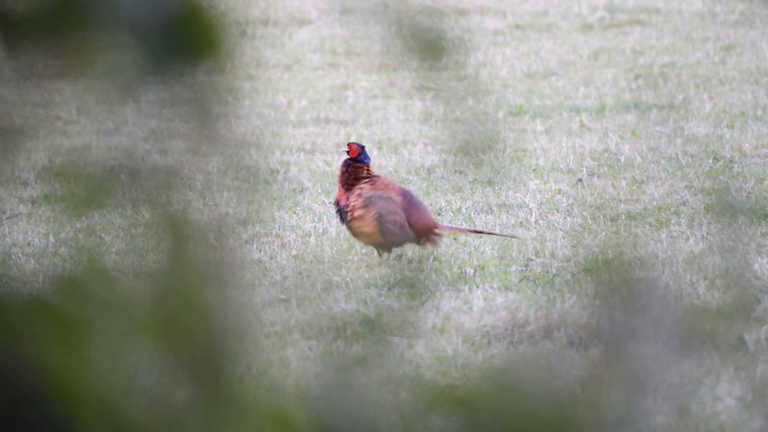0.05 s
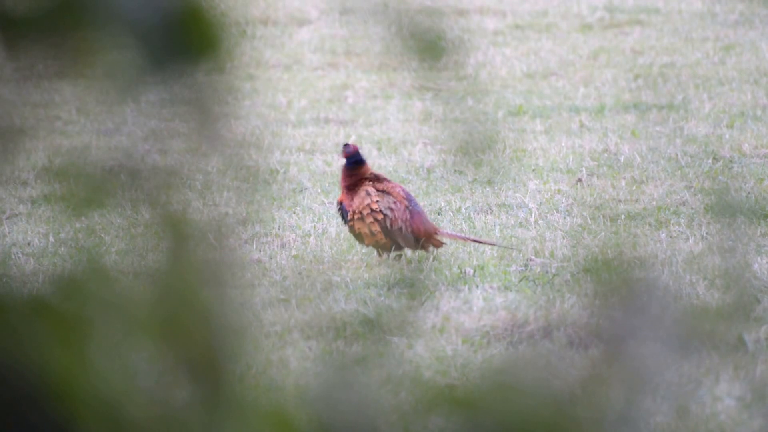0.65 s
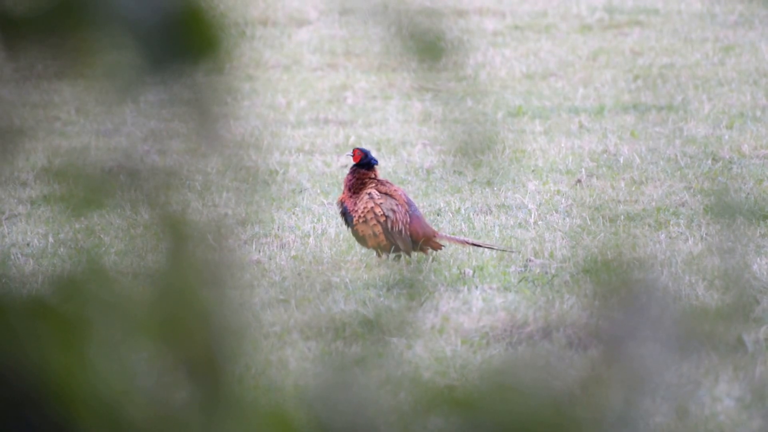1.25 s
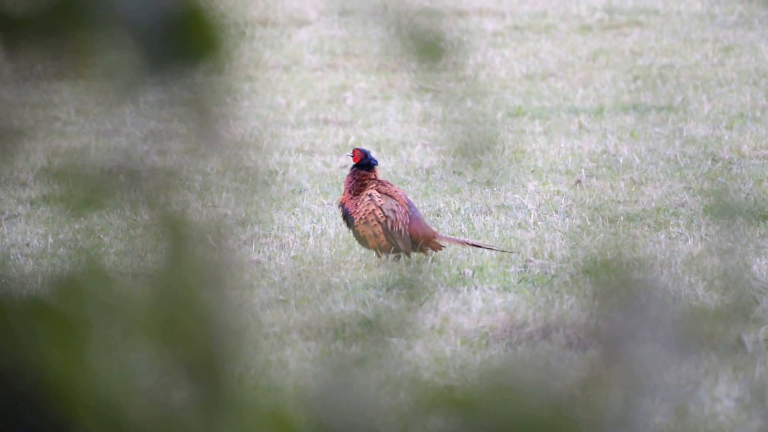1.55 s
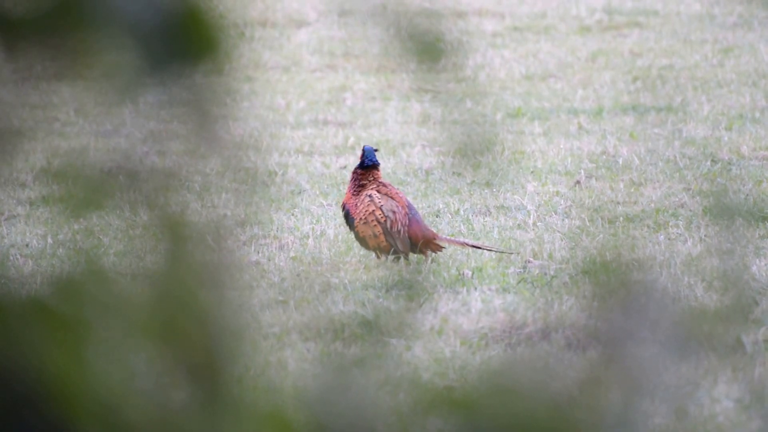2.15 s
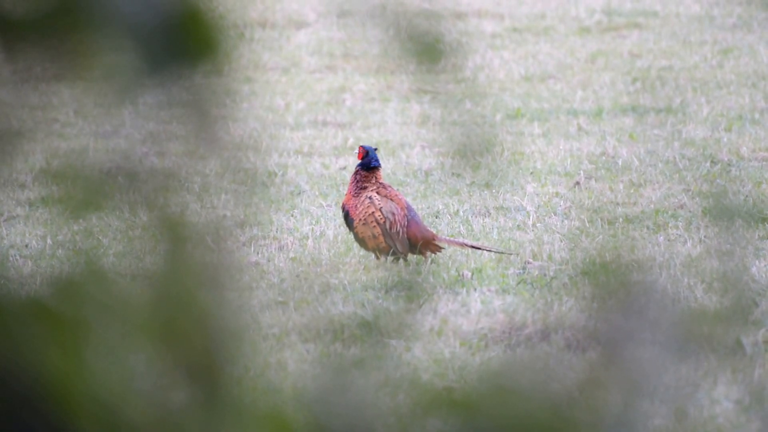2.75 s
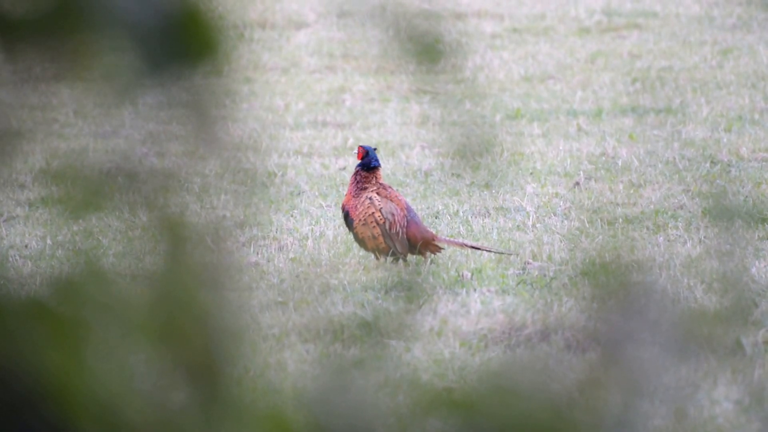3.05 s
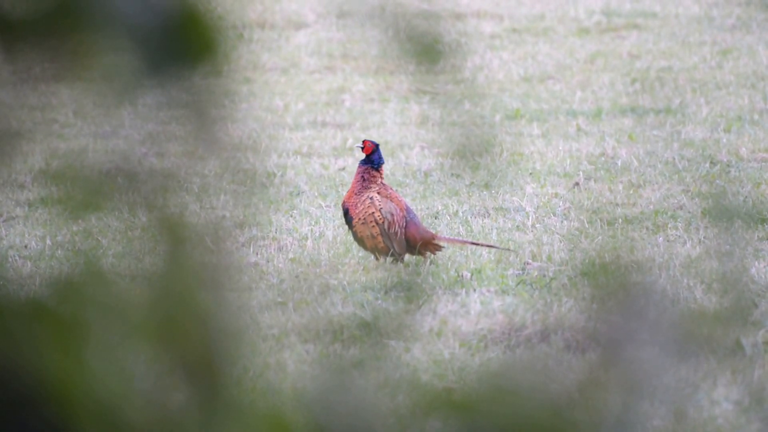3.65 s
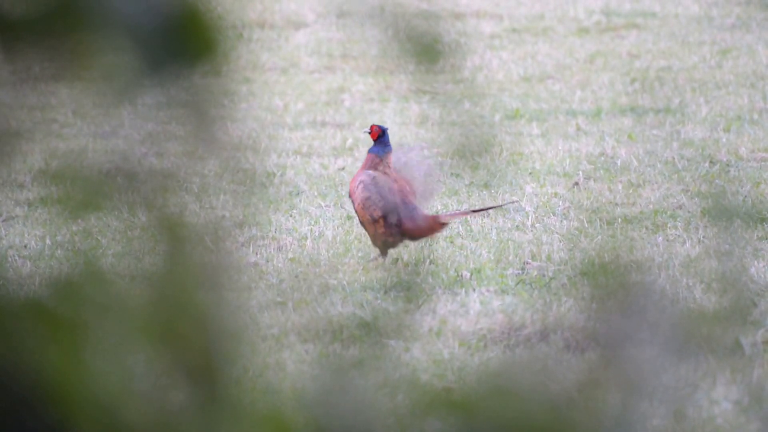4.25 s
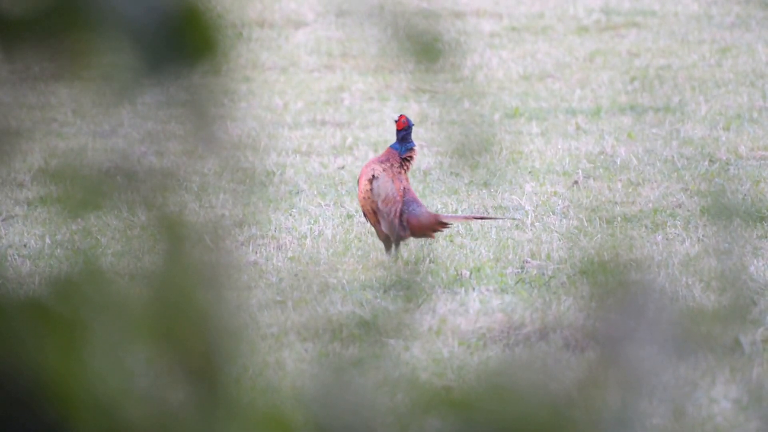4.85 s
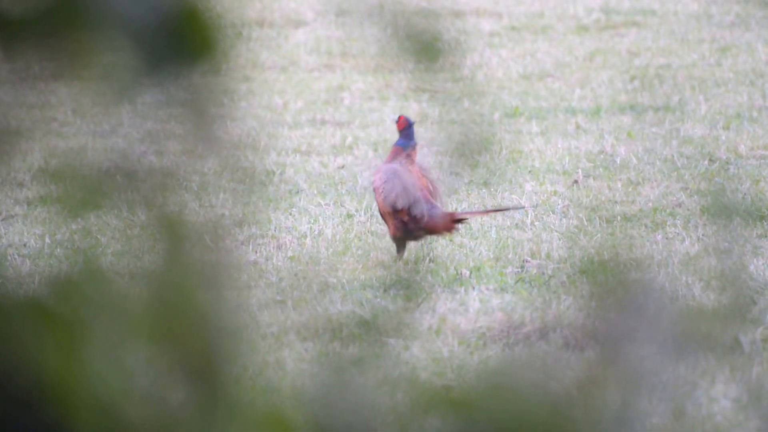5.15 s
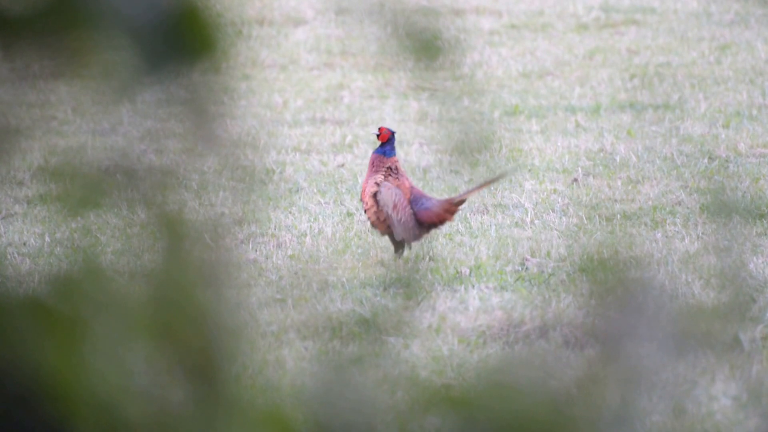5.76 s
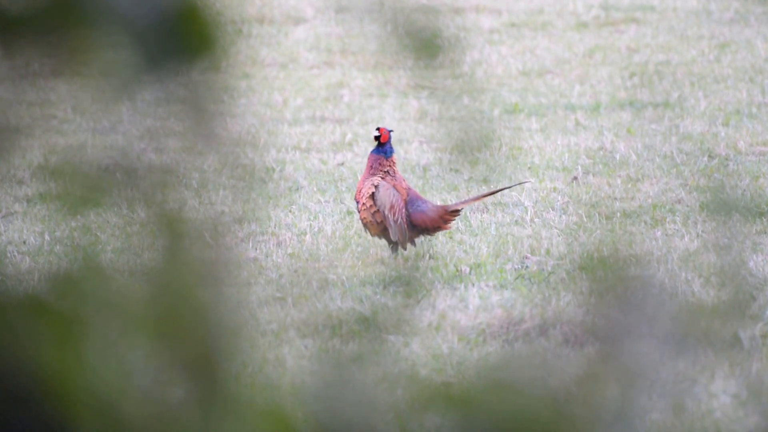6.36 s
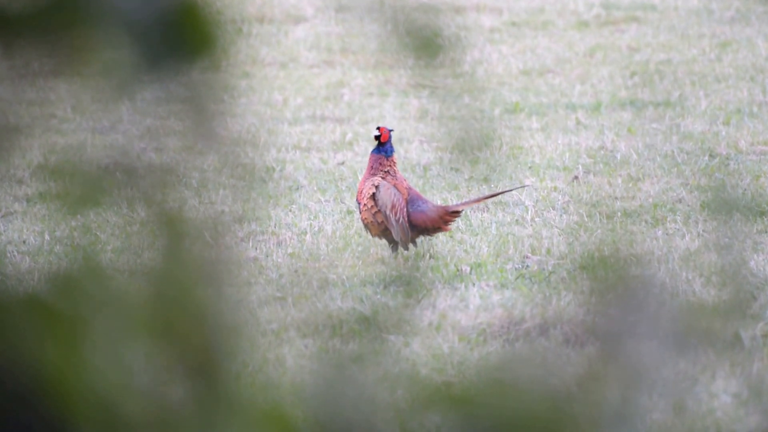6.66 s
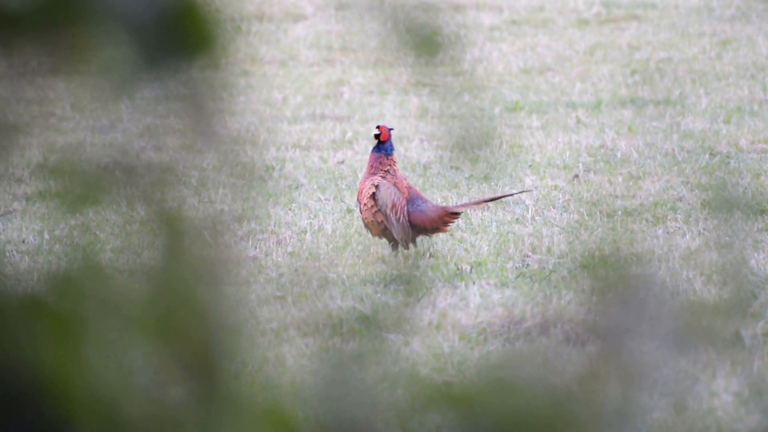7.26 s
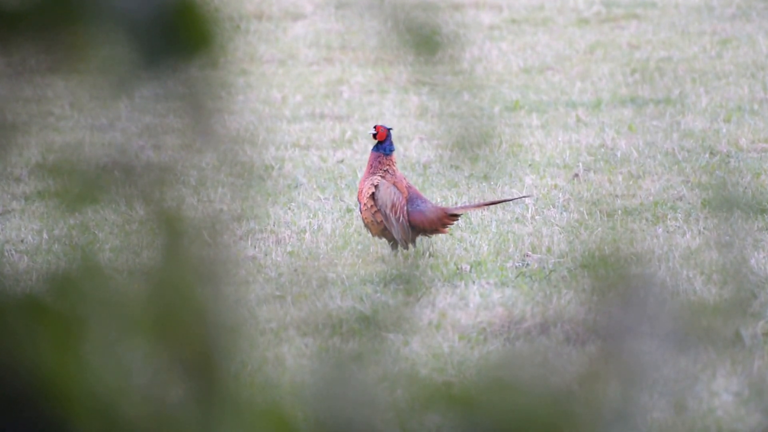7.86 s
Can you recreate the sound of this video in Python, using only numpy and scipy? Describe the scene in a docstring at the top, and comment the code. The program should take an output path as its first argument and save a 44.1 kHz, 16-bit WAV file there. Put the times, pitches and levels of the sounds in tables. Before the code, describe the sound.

Steady hiss in a quiet field, then a pheasant crows twice harshly, flutters its wings and calls softly three times.

```python
"""Cock pheasant on a meadow

A harsh double crow, a whirr of wings and three softer calls. The two sides of the syrinx sound
at once: rasping when forced, ringing with sum and difference tones when eased. Near shrubs and the
wood's edge scatter the sound back, and a far tree line echoes it. Under it all lie distant outdoor
noise and the camera's steady, ringing hiss; a few soft bumps reach the microphone near the end."""
import sys
import numpy as np
from scipy import signal
from scipy.fft import rfft, irfft
from scipy.io import wavfile
from scipy.ndimage import uniform_filter1d, minimum_filter1d

SR = 44100
rng = np.random.default_rng(int(sys.argv[2]) if len(sys.argv) > 2 else 0)


def transcribe(signal):
    """Save signal, clipped to [-1, 1], as a 16-bit WAV file at the path in sys.argv[1]."""
    frames = np.atleast_2d(signal).T
    limited = np.clip(frames, -1, 1)
    pcm = np.round(limited * 32767).astype(np.int16)
    wavfile.write(sys.argv[1], SR, pcm)


N = 348831
T = np.arange(N) / SR
FREQ = np.arange(N // 2 + 1) * SR / N


def undb(db):
    """Decibels to gain."""
    return np.exp(np.asarray(db) * np.log(10) / 20)


def unit(x):
    """Scale to rms 1."""
    return x / np.sqrt(np.mean(x ** 2))


def shape(x, gain):
    """Filter by a gain per frequency; rms 1."""
    return unit(irfft(rfft(x) * gain, N))


def colour(points):
    """Gain per frequency from (Hz, dB) points."""
    hz, db = np.transpose(points)
    return undb(np.interp(np.log(FREQ + 1), np.log(hz), db))


def noise(gain):
    """Coloured noise of rms 1."""
    return unit(irfft(rng.standard_normal(2 * len(FREQ)).view(complex) * gain, N))


def wander(rate_hz):
    """Smooth random motion of rms 1, mostly slower than rate_hz."""
    return noise(np.exp(-np.minimum(.5 * (FREQ / rate_hz) ** 2, 20)))


def throb(rate_hz, depth):
    """Bounded random swings of loudness; rms 1."""
    return unit(1 + depth * np.tanh(wander(rate_hz)))


def turn(hz):
    """Phase of an oscillator with a moving pitch."""
    return 2 * np.pi * np.cumsum(hz) / SR


def swell(at, width):
    """A bell-shaped envelope; times in seconds."""
    return np.exp(-np.minimum(.5 * ((T - at) / width) ** 2, 20))


def ramp(start, length):
    """Rises from 0 to 1 over length seconds."""
    return np.clip((T - start) / length, 0, 1)


def held(start, length, attack, release):
    """A gate that opens just before the start, holds for length seconds and dies away."""
    rise = np.minimum(T - start, 0) / attack
    fall = np.maximum(T - start - length, 0) / release
    return np.exp(np.maximum(rise - fall, -20))


def swing(at, hz):
    """One suction followed by one push of air."""
    return swell(at, 0.63 / hz) * np.sin(2 * np.pi * hz * (T - at))


def outdoor_air():
    """Steady outdoor noise and microphone hiss, with one low swell in the distance."""
    # spectrum of the noise floor: frequency_hz, level_db
    floor_spectrum = [(20, -14.5), (70, -1.5), (190, 1), (290, -4), (680, -3), (1300, -8.5), (2300, -11),
                      (3500, -10.5), (5000, -8), (6300, -23.5), (6900, -17), (8500, -22.5), (11000, -24.5),
                      (15500, -25)]
    breeze_db = .35 * wander(5)
    air = noise(colour(floor_spectrum)) * undb(-49.8 + breeze_db)
    distant = noise(colour([(120, -14), (220, 3.5), (330, 3), (480, -17), (1000, -45)]))
    return air + distant * swell(at=0.79, width=0.43) * undb(-59)


def camera_hiss():
    """The camera's own hiss rings in narrow resonances and flickers slightly."""
    # resonances: centre_hz, width_hz, relative_db
    resonances = [(2680, 62, -12), (2880, 27, -7), (3870, 110, -2.5), (3944, 37, 2.5), (4280, 130, -6),
                  (4316, 18, 0.5), (4540, 340, -7.5), (4795, 32, 3), (5170, 59, -5), (5334, 194, 0),
                  (5980, 36, -13), (6130, 265, -1.5), (6150, 55, -9)]
    power = sum(undb(db) ** 2 / (1 + 2 * ((FREQ - hz) / width) ** 2) ** 2
                for hz, width, db in resonances)
    flicker_db = 1.1 * wander(32) + .4 * wander(1)
    return noise(np.sqrt(power)) * undb(-49.5 + flicker_db)


def squeaks():
    """Before it breaks into the rasp, the syrinx briefly whistles with a strong octave."""
    # one thin squeak per crow syllable: peak_s, pitch_hz, level_db, length_s
    onsets = [(4.68, 2690, -30, 0.01), (5.088, 2735, -32.5, 0.01)]
    out = 0
    for at, hz, db, length in onsets:
        phase = 2 * np.pi * hz * T
        tone = 0.7 * np.sin(phase) + 1.3 * np.sin(2 * phase)
        out += undb(db) * swell(at, length / 2) * tone
    return out


def crow():
    """One membrane shrieks on its fourth harmonic and slaps chaotically; the other sings low."""
    # the double crow: start_s, length_s, shriek_hz, low_hz, then the levels
    # that the pressure scales: shriek_db, low_db, rasp_db
    syllables = [(4.684, 0.16, 3856, 1042, -11.5, -34, -18), (5.089, 0.044, 3932, 1043, -14.5, -31, -22.5)]
    # response of the throat and open beak: frequency_hz, gain_db
    throat = [(480, -33), (720, -11), (1100, -18), (1450, -9.5), (1880, -8.5), (2250, -11), (2850, -15),
              (3600, 5), (4300, -12), (4900, -3), (6100, -8), (7200, -20.5), (7900, -16), (11500, -33)]
    build_share, rasp_build_share, ease_s = 0.2, 0.32, 0.031  # pressure builds, holds, then eases
    start_flat, shriek_sag, low_sag = .013, 0.028, .056  # shares of pitch
    # the air pressure flutters, and each partial throbs
    flutter, low_throb, octave_throb = throb(90, .36), throb(50, .5), throb(60, .9)
    shriek_drift, low_drift = 1 + 0.0094 * wander(198), 1 + 0.0095 * wander(130)
    slap_drift, slap_throb = 1 + .09 * wander(711.5), throb(600, 0.67)
    breath = rng.standard_normal(N)
    shriek_jitter, octave_jitter = .34 * wander(600), 1.1 * wander(70)
    out = 0
    for start, length, shriek_hz, low_hz, shriek_db, low_db, rasp_db in syllables:
        # pitch and loudness follow the pressure
        built, eased = ramp(start, build_share * length), ramp(start + length - ease_s, ease_s)
        slack = 1 - built * (1 - eased)
        fundamental_hz = shriek_hz / 4 * (1 - start_flat * (1 - built) - shriek_sag * eased)
        phase = turn(fundamental_hz * shriek_drift)
        low_phase = turn(low_hz * (1 - low_sag * ramp(start, length) ** 2) * low_drift)
        # the low voice pulls at the shriek and throws side tones around it
        pull = 0.22 * np.sin(low_phase) + shriek_jitter
        shriek = np.sin(4 * phase + pull) * flutter
        # the two fundamentals beat against each other, which makes the crow rattle
        low = np.sin(low_phase) * low_throb + undb(-15) * np.sin(phase)
        voices = undb(shriek_db - 7 * slack) * shriek + undb(low_db - 3 * eased) * low
        octave = undb(-8.5) * np.sin(2 * phase + octave_jitter) * octave_throb
        slap_phase = turn(fundamental_hz * slap_drift)
        slaps = unit(np.exp(60 * (np.cos(slap_phase) - 1)) * slap_throb)  # one sharp pulse a cycle
        rasp = shape(slaps + .25 * breath, colour(throat)) * flutter
        rasp_cut_db = 6.75 - 4.5 * ramp(start, rasp_build_share * length) + 8 * eased
        gate = held(start, length, attack=0.0027, release=0.0019)
        out += gate * (voices + undb(rasp_db - rasp_cut_db) * (rasp + octave))
    return out


def tree_scatter(x, early_db=-5.5, early_t60_s=0.2, late_db=-10.5, late_t60_s=0.57):
    """Near shrubs answer at once, the wood's edge a little later and for longer."""
    # colour of the scatter: frequency_hz, gain_db
    scatter_spectrum = [(300, -9.5), (1000, 4), (1900, -4), (2900, -4.5), (3800, -4), (5100, 3.5),
                        (7500, -2), (13000, -1)]
    tint = colour(scatter_spectrum)
    early = noise(1) * undb(-60 * T / early_t60_s) * (T > .012)
    late = noise(1) * undb(-60 * T / late_t60_s) * (1 - np.exp(-(T / 0.041) ** 2))
    response = (undb(early_db) * shape(early, tint) + undb(late_db) * shape(late, tint)) / np.sqrt(N)
    return signal.fftconvolve(x, response[:SR])[:N]


def far_echo(x, delay_s=.565):
    """A distant tree line returns a faint, dull copy."""
    tint = colour([(500, -42), (1100, -36), (1600, -39), (2100, -31), (3500, -44), (7000, -58)])
    return np.interp(T - delay_s, T, irfft(rfft(x) * tint, N), left=0)


def wing_whirr(count=6, first_s=5.301, beat_s=.0708, quicken_s=0.0016):
    """Quickening downstrokes thump the air, softer upstrokes follow; feathers rustle, quills snap."""
    # quills snapping together: time_s, level_db
    quills = [(5.311, -27), (5.4525, -26.5), (5.5315, -34), (5.575, -31)]
    k = np.arange(count)
    times = first_s + beat_s * k - quicken_s * k * (k - 1) / 2
    levels_db = np.where(k < count - 1, -41.2, -51)  # the last beat is only a weak flick
    thumps = strokes = 0
    for at, db in zip(times, levels_db):
        thumps += undb(db - 2) * swing(at, hz=85)
        down, up = swell(at, 0.0079), 0.42 * swell(at + 0.054, 0.016)
        strokes += undb(db) * (down + up)
    whoosh = noise(colour([(40, -13), (90, 1.5), (140, 4.5), (260, -7.5), (450, -0.5),
                           (750, -17.5), (2000, -47)]))
    rustle = noise(colour([(400, -12), (1500, 1), (3500, 0), (6000, -13), (11000, -24)]))
    feathers = whoosh + undb(-7.5) * rustle
    snaps = sum(undb(db) * swing(at, hz=2700) for at, db in quills)
    return thumps + strokes * feathers + snaps


def soft_calls():
    """A whistle and a second voice modulate each other, giving sum and difference tones."""
    # the three calls: start_s, length_s, whistle_hz, second_hz, scatter_share (of second_hz),
    # whistle_db, second_db (base for its tones), overtone_db, overtone_lag_s
    calls = [(5.5, 0.067, 3606, 1995, .022, -20.5, -39.5, -32, 0.059),
             (5.81, 0.049, 3664, 2085, 0.012, -25, -30, -34, 0.057),
             (6.18, 0.047, 3686, 2098, 0.013, -27, -30, -33, 0.035)]
    # tones of the coupled voices: whistle_multiple, second_multiple, relative_db
    coupled_tones = [(0, 1, 3), (1, -1, -1.5), (1, 1, -0.5), (2, -1, -3.5), (0, 2, -8.5), (2, -2, -15),
                     (3, -3, -12), (-1, 3, -19), (0, 3, -15), (3, -2, -19), (1, 2, -25), (3, -1, -31),
                     (2, 1, -31)]
    lead_s, sharp_hz, settle_s = 0.0217, 110, 0.0256  # the whistle sets in early and sharp, then settles
    split_hz, linger_s = 4000, 0.021  # tones above the split last longer
    drift, flutter = 1 + .0035 * wander(110), throb(40, .35)
    scatter, tremble = wander(130), .28 * np.sin(turn(118 + 14 * wander(30)))
    husk = undb(-17) * noise(colour([(1200, -36), (1700, -4), (2700, -2), (4300, -8), (5400, 1),
                                     (6600, -4), (8500, -12), (12000, -36)]))
    out = 0
    for (start, length, whistle_hz, second_hz, scatter_share,
         whistle_db, second_db, overtone_db, overtone_lag) in calls:
        hz = whistle_hz + sharp_hz * np.exp(-np.clip((T - start + lead_s) / settle_s, 0, 20))
        phase = turn(hz * drift)
        second_phase = turn(second_hz * (1 + scatter_share * scatter)) + tremble
        whistle = undb(whistle_db) * swell(start + 0.029, width=0.03) * np.sin(phase)
        overtones = np.sin(2 * phase) + undb(-31) * np.sin(3 * phase)
        overtones *= undb(overtone_db) * swell(start + overtone_lag, width=0.023)
        soft_entry = undb(-6 * (1 - ramp(start - .003, .006)))
        dark, bright = 0, husk
        for m, n, db in coupled_tones:
            tone = undb(db) * np.sin(round(m) * phase + round(n) * second_phase)
            if m * whistle_hz + n * second_hz < split_hz:
                dark = dark + tone
            else:
                bright = bright + tone
        # the second voice needs more pressure, so it starts later and grows through the call
        to_go = 1 - ramp(start, length)
        dark_gain = held(start, length, attack=0.0032, release=0.0074) * undb(-3 * to_go)
        bright_gain = held(start, length + linger_s, attack=0.0033, release=.008) * undb(-.5 - 7 * to_go)
        second_voice = undb(second_db) * (dark_gain * dark + bright_gain * bright)
        out += flutter * (soft_entry * (whistle + overtones) + second_voice)
    return out


def microphone_bumps():
    """Single slow pressure swings right at the microphone."""
    # soft low bumps: time_s, level_db, pitch_hz
    bumps = [(6.369, -43, 54.4), (6.501, -43.5, 65), (7.27, -50, 45), (7.39, -58, 50)]
    return sum(undb(db) * swing(at, hz) for at, db, hz in bumps)


def scene():
    """The bird and its echoes over the meadow's background, on one microphone."""
    bird = squeaks() + crow() + wing_whirr() + soft_calls()
    meadow = bird + tree_scatter(bird)
    return (outdoor_air() + camera_hiss() + meadow + far_echo(meadow) + microphone_bumps())[None]


def record(dry):
    """The camera's limiter holds down the loudest peaks; the top of the treble is cut."""
    ceiling, hold_samples, top_hz = .66, 45, 15800
    gain = minimum_filter1d(ceiling / np.maximum(np.abs(dry), ceiling), size=hold_samples)
    limited = dry * uniform_filter1d(gain, size=hold_samples)
    return signal.sosfilt(signal.ellip(10, .1, 80, top_hz, fs=SR, output="sos"), limited)


dry = scene()
out = record(dry)
transcribe(out)
```